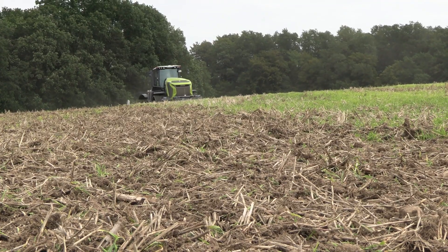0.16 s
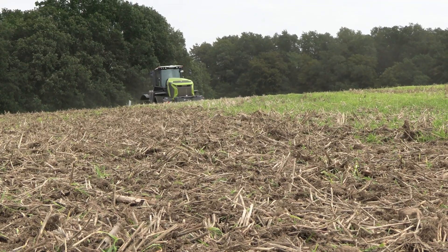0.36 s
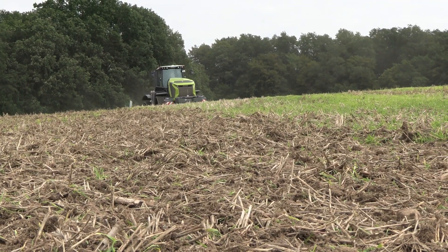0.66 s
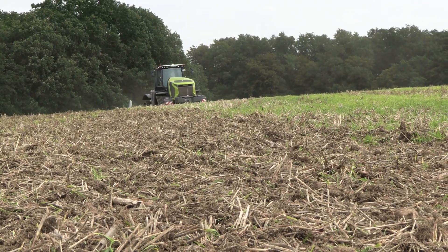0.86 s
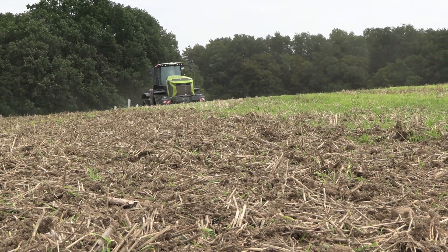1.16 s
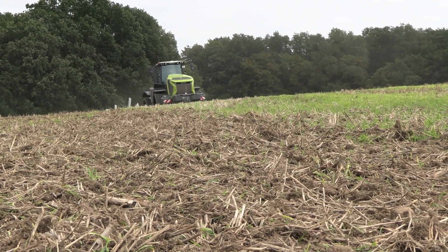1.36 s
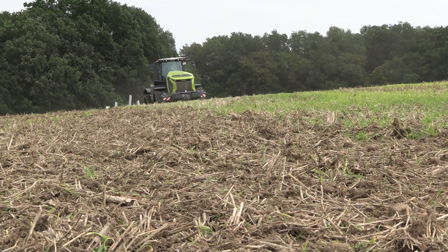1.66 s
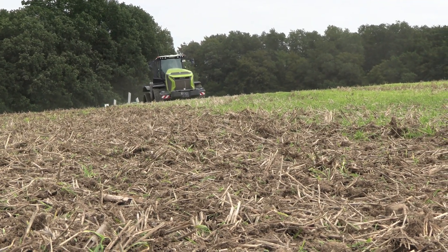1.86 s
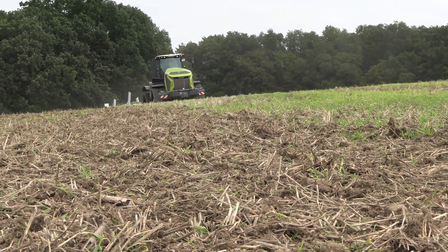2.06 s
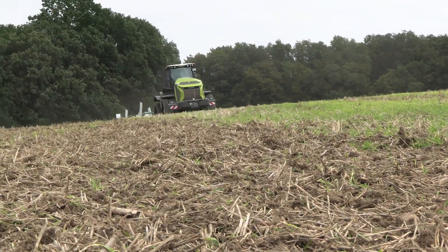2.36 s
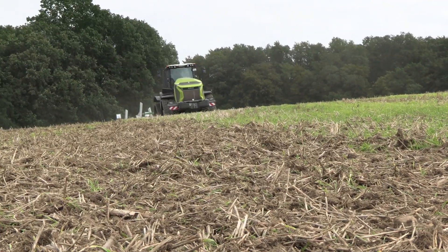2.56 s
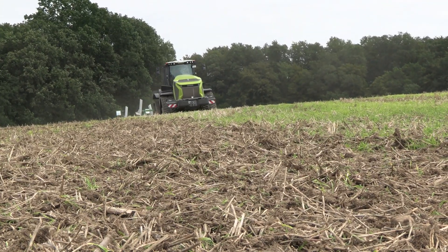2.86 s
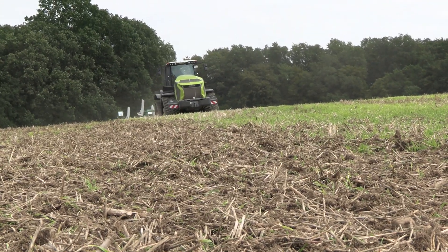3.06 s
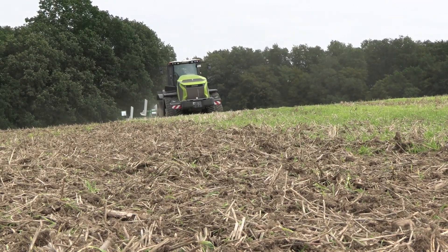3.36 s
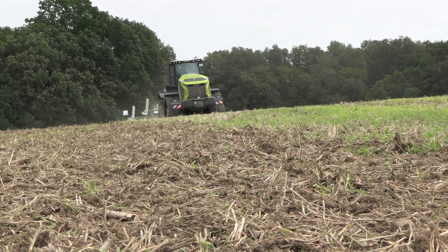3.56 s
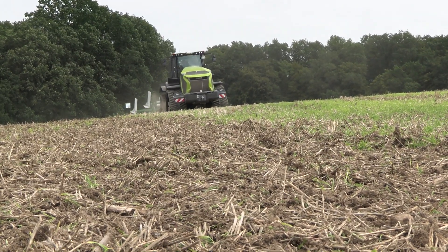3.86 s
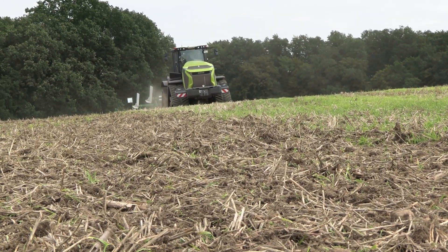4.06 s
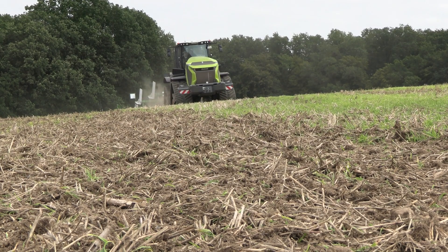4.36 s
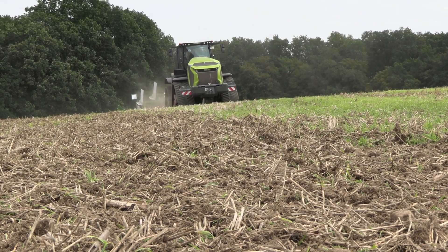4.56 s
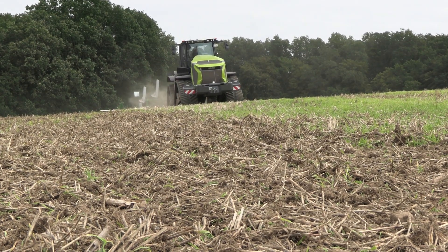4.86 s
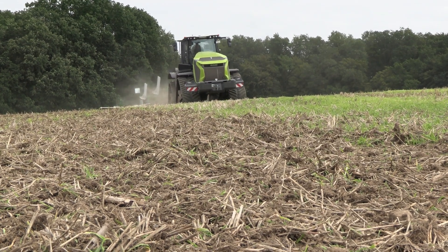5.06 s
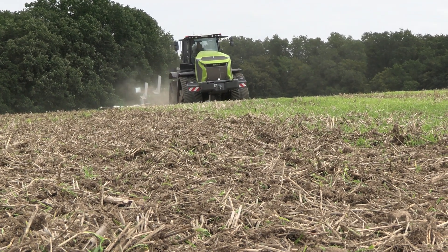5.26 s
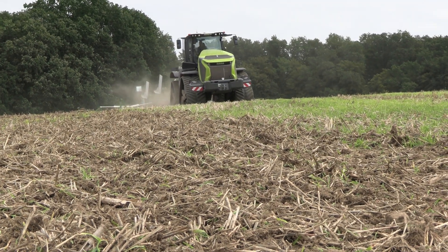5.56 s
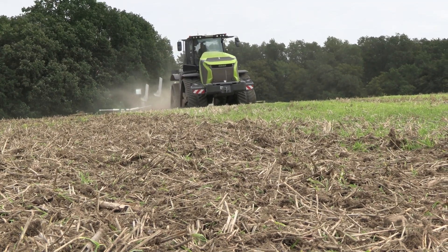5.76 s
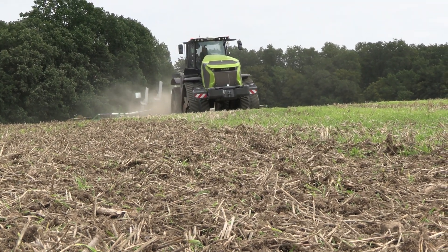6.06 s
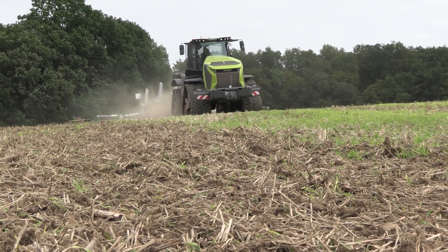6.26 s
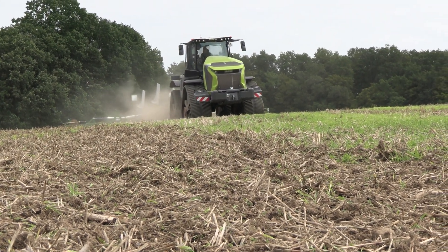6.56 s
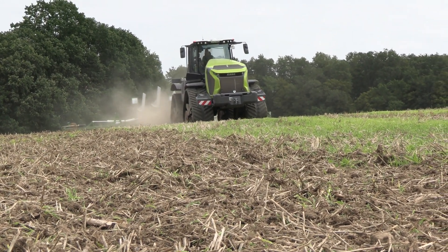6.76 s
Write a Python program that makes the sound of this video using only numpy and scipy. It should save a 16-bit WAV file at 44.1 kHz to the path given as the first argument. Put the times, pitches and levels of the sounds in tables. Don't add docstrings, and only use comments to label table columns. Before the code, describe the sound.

Outdoors in an open field, strong wind pounds an unprotected camera microphone with deep, overloaded thumps. Behind it a heavy diesel tractor works steadily under load, with low exhaust throb, block clatter, gear whine and rattling harrow steel. Automatic gain makes the machine dip at gusts, with dry ticks, especially in the first half. The final half second brings the machine forward.

```python
import sys
import numpy as np
from scipy import signal
from scipy.fft import rfft, irfft, next_fast_len
from scipy.io import wavfile
from scipy.ndimage import uniform_filter1d, map_coordinates

SR = 44100
rng = np.random.default_rng(int(sys.argv[2]) if len(sys.argv) > 2 else 0)


def unload_wav(signal):
    wavfile.write(
        sys.argv[1],
        SR,
        np.round(np.clip(np.atleast_2d(signal).T, -1, 1) * 32767).astype(np.int16),
    )


def attenuation_scalar(level_db):
    decades = np.asarray(level_db, float) / 20
    return 10 ** decades


N = 304290

# start_s, gain_drop_db, held_s, tick_peak_db
GAIN_DUCKS = [(0.188, 9, 0.16, -53), (0.4286, 6.5, 0.11, -53), (.748, 5.5, 0.013, -61),
              (0.913, 10.5, 0.015, -63), (1.01, 6, 0.014, -70), (1.057, 7, 0.07, -50.5),
              (1.188, 9.5, 0.065, -52), (1.43, 5.5, 0.073, -66), (1.4815, 7, 0.022, -51),
              (1.542, 11, 0.086, -50), (1.826, 8, 0.036, -60), (1.91, 6.5, 0.1, -50),
              (2.11, 3.5, 0.021, -68), (2.35, 8, 0.11, -51), (2.545, 8, .02, -49), (2.597, 12, 0.057, -48),
              (2.759, 4, 0.025, -65), (2.875, 2, 0.036, -51), (3.08, 4.5, 0.016, -62),
              (3.6306, 6.5, 0.078, -49), (3.735, 5.5, 0.059, -57), (4.0197, 5, 0.11, -49.5),
              (4.1803, 8, 0.094, -51), (4.3839, 4.5, .04, -53.5), (4.93, 2.5, 0.044, -66),
              (5.806, 3.5, 0.068, -68), (6.58, 1, 0.011, -64)]


def unit(x):
    return x / np.sqrt(np.mean(x ** 2) + 1e-20)


def curves(rows):
    s, *cols = np.transpose(rows)
    return [np.interp(np.arange(N) / SR, s, c) for c in cols]


def wobble(rate_hz):
    knots = rng.standard_normal(int(N * 200 / SR))
    return map_coordinates(knots, [np.arange(N) * min(rate_hz, 190) / SR])


def swells(rows):
    t = np.arange(N) / SR
    return np.sqrt(sum(attenuation_scalar(2 * db) * np.exp(-((t - s) / half_s) ** 2) for s, db, half_s in rows))


def filtered(x, response):
    m = next_fast_len(N + 8192)
    return irfft(rfft(x, m) * response(np.fft.rfftfreq(m, 1 / SR)), m)[:N]


def colour(points):
    f, db = np.transpose(points)
    return lambda hz: attenuation_scalar(np.interp(np.log(hz + 1), np.log(f + 1), db))


def rush(spectrum, patchy_db):
    z = signal.stft(rng.standard_normal(N), nperseg=512)[2]
    field = uniform_filter1d(rng.standard_normal(z.shape), size=5, axis=0)
    field = uniform_filter1d(field, size=8, axis=1)
    patchy = signal.istft(z * attenuation_scalar(patchy_db * unit(field)), nperseg=512)[1][:N]
    return filtered(patchy, colour(spectrum))


def evened(spectrum):
    swing = unit(filtered(rng.standard_normal(N), colour(spectrum)))
    power = np.abs(uniform_filter1d(swing ** 2, size=6000))
    return unit(swing / (power + .02) ** .4)


def ducking():
    snap_s, recover_s = .012, .045
    t = np.arange(N) / SR
    drop_db = 0
    for s, db, held_s, _ in GAIN_DUCKS:
        fall = np.clip((t - s) / snap_s, 0, 1)
        creep = np.exp(-(np.maximum(t - s - held_s, 0) / recover_s) ** 2)
        drop_db = drop_db + db * fall * creep
    return -drop_db


def buffet():
    # freq_hz, level_db_per_hz
    slow_spectrum = [(2, -22), (5, -5), (13, 0), (20, -3), (25, -12), (35, -50), (60, -140)]
    # freq_hz, level_db_per_hz
    flutter_spectrum = [(6, -140), (14, -50), (22, -0.5), (30, -4), (40, -6.5), (62, -17.5), (100, -31.5),
                        (200, -61), (500, -140)]
    # time_s, peak_db, half_length_s
    eddies = [(.16, -7, 0.048), (.46, -9, 0.097), (.72, -14.5, 0.11), (.98, -14.5, 0.042),
              (1.16, -14, 0.074), (1.4, -10, 0.076), (1.8, -19.5, 0.072), (2.1, -10, 0.11),
              (2.3, -15, 0.082), (2.52, -18.5, .05), (2.78, -14.5, 0.075), (2.97, -11, 0.087),
              (3.2, -17.5, 0.12), (3.7, -15.5, 0.058), (3.92, -11, 0.073), (4.13, -11.5, .06),
              (4.32, -13, 0.047), (4.6, -11.5, 0.079), (4.75, -12.5, .06), (4.92, -10, 0.047),
              (5.12, -15, 0.09), (5.4, -12, 0.15), (5.72, -13, 0.13), (6.07, -14, 0.099),
              (6.28, -16.5, 0.038), (6.45, -13.5, 0.041), (6.68, -9, 0.068), (6.88, -11.5, .05)]
    calm_db = -26
    slow = attenuation_scalar(-9.6) * evened(slow_spectrum)
    push = slow + np.hypot(swells(eddies), attenuation_scalar(calm_db)) * evened(flutter_spectrum)
    crest = np.exp(-(np.arange(N) / SR / .012) ** 2)
    return push + (.6 - push[0]) * crest


def snaps():
    # time_s, tick_peak_db
    small_steps = [(0.0882, -54), (0.7996, -62), (1.1104, -68), (1.26, -66), (1.3196, -45), (1.612, -52),
                   (1.669, -58), (2.0314, -61), (2.735, -50), (2.814, -60), (3.261, -59), (3.398, -52),
                   (3.7688, -58.5), (3.8496, -65), (3.8836, -56.5), (4.339, -60), (4.6374, -54.5),
                   (4.6728, -52), (4.8204, -53), (5.19, -62), (5.2814, -59), (5.42, -56), (5.5842, -61),
                   (5.73, -61), (5.892, -65), (6.05, -61), (6.32, -60), (6.4398, -51), (6.667, -56),
                   (6.7062, -46)]
    # freq_hz, level_db_per_hz
    tick_spectrum = [(300, -120), (1000, 3), (4000, -5), (9000, -6), (12000, -9.5), (15500, -13.5),
                     (16500, -120)]
    grit = [(1.345 + k * .021, -45 - k * 2.5) for k in range(5)]
    big_steps = [(s, db) for s, _, _, db in GAIN_DUCKS]
    s, db = np.transpose(small_steps + grit + big_steps)
    impulses = np.bincount(np.round((s + .003) * SR).astype(int), attenuation_scalar(db), N)
    decay = np.exp(-np.abs(np.arange(-SR // 10, SR // 10 + 1)) / SR / 0.0086)
    shape = signal.fftconvolve(impulses, decay, "same")
    return attenuation_scalar(-1.5) * shape * unit(filtered(rng.standard_normal(N), colour(tick_spectrum)))


def bonnet():
    # time_s, peak_db, half_length_s
    booms = [
        (.82, -61.5, 0.072),
        (3.2, -50, .14),
        (6.75, -57, 0.072),
    ]
    centre_hz, width_hz = 880, 220
    ring = lambda f: 1 / (1 + (2 * (f - centre_hz) / width_hz) ** 2)
    return swells(booms) * unit(filtered(rng.standard_normal(N), ring))


def chatter():
    # centre_hz, width_hz, level_db
    resonances = [(1600, 140, -2.5), (2070, 60, -2), (2260, 70, -1), (3050, 70, -3), (3650, 70, -6),
                  (4300, 80, -4.5), (5130, 90, -4.5), (5950, 70, -3), (6950, 60, -12), (8150, 66, -12),
                  (9250, 84, -20)]
    # start_s, held_s, level_db
    shakes = [
        (0, .16, -51),
        (.62, .04, -57),
        (.85, 0, -58),
        (1.35, .03, -55),
        (4.9, 0, -60),
        (5.75, 0, -61),
        (5.94, 0, -61),
    ]
    rise_db_per_s, fall_db_per_s = 352, 403
    t = np.arange(N) / SR
    shake = 0
    for s, held_s, db in shakes:
        before_db = rise_db_per_s * np.maximum(s - t, 0)
        after_db = fall_db_per_s * np.maximum(t - s - held_s, 0)
        shake = shake + attenuation_scalar(db - before_db - after_db)
    ring = lambda f: sum(attenuation_scalar(db) / (1 + (1.3 * (f - c) / w) ** 2) for c, w, db in resonances)
    return shake * unit(attenuation_scalar(3.7 * wobble(55)) * filtered(rush([(0, 0)], patchy_db=2.5), ring))


def humps(hz):
    # centre_hz, width_hz, gain_db
    panels = [(835, 43, 4.5), (1560, 36, 0.5), (1980, 110, 0), (5186, 210, 5), (6130, 180, 1),
              (8380, 340, 7)]
    return attenuation_scalar(sum(db / (1 + ((hz - c) / (w / 2)) ** 2) for c, w, db in panels))


def harrow(harrow_db, duck_db):
    # freq_hz, level_db_per_hz
    steel_spectrum = [(900, -120), (1800, 1), (3000, 1.5), (4700, 0.5), (6000, -2), (7000, -8),
                      (9000, -11.5), (11000, -17.5), (15600, -30.5), (16500, -120)]
    # time_s, extra_rattle_db
    jolts = [(.42, -4), (.64, 4), (.98, 5), (2.08, 4), (2.54, -4), (2.99, 5), (4.9, 9.5), (5.73, 2),
             (5.77, 5.5), (5.94, 6), (6.0, 3.5)]
    jolt_half_s, duck_share = .0094, .83
    t = np.arange(N) / SR
    rattle_db = harrow_db + sum(db * np.exp(-((t - s) / jolt_half_s) ** 2) for s, db in jolts)
    shaking = attenuation_scalar(0.88 * wobble(13) + 1.2 * wobble(90))
    steel = unit(shaking * filtered(rush(steel_spectrum, patchy_db=2.0), humps))
    return attenuation_scalar(rattle_db + 0.47 + duck_share * duck_db) * steel


def whine(hz, blur_hz, flutter_db):
    turns = np.cumsum(hz + blur_hz * wobble(120)) / SR
    flutter = attenuation_scalar(flutter_db * (0.67 * wobble(11) + wobble(45)))
    return np.sqrt(2) * flutter * np.sin(2 * np.pi * turns)


def gears(firing_hz):
    # time_s, pitch_hz
    wheel_track = [(0, 1760), (1.6, 1790), (2.1, 1825), (2.45, 1900), (2.75, 1975), (3.3, 2025), (4, 2015),
                   (4.8, 1995), (5.6, 2030), (6.9, 2030)]
    # time_s, wheel_db, pump_db
    tooth_levels = [(0, -6, -3), (.7, -5, 1), (1.4, -4, -3), (1.98, -1, -2), (2.08, 9, -2), (2.3, 6, -3),
                    (2.45, 1, -4), (2.75, 6, -5), (3.5, 2, -2), (4.2, 1, 2), (4.9, 0, 5), (5.2, 0, 8),
                    (6.05, 0, 8), (6.2, 0, 0), (6.9, -2, -4)]
    # time_s, pitch_hz, level_db
    turbo_track = [(0, 10700, -44), (2.4, 11000, -38), (3.6, 10950, -38), (5.1, 10680, -32),
                   (6, 10500, -34), (6.5, 10370, -28), (6.9, 10330, -28)]
    wheel_hz = curves(wheel_track)[0]
    wheel_db, pump_db = curves(tooth_levels)
    turbo_hz, turbo_db = curves(turbo_track)
    wheel = attenuation_scalar(wheel_db - 15) * whine(wheel_hz, blur_hz=45, flutter_db=3)
    shaft = attenuation_scalar(-19) * whine(wheel_hz * 9 / 26, blur_hz=5, flutter_db=3)
    pump = attenuation_scalar(pump_db - 18) * whine(firing_hz * 26, blur_hz=4, flutter_db=2.5)
    turbo = attenuation_scalar(turbo_db) * whine(turbo_hz, blur_hz=55, flutter_db=4)
    return wheel + shaft + pump + turbo


def block(turns):
    # freq_hz, level_db_per_hz
    block_spectrum = [(260, -24), (450, -0.5), (655, -3.5), (910, -2.5), (1150, -6), (1890, -7),
                      (2050, -5.5), (2310, -11), (4000, -21.5), (5200, -53.5), (8800, -120)]
    knock = 1 + .15 * np.cos(2 * np.pi * turns)
    clatter = filtered(rush(block_spectrum, patchy_db=0.5), humps)
    return unit(knock * attenuation_scalar(1.02 * wobble(30)) * clatter)


def engine(turns):
    # centre_hz, width_hz, level_db
    pipe_modes = [(57, 28, -10), (113, 40.7, 0), (173.5, 41.8, 2), (247.3, 60, -8), (342, 69, -17.5)]
    at = np.flatnonzero(np.diff(np.floor(turns)))
    cylinder_db = 6.1 * np.cos(np.arange(len(at)) * np.pi / 3)
    stroke_db = 5.9 * np.tanh(rng.standard_normal(600)[:len(at)])
    pulses = np.zeros(N)
    pulses[at] = attenuation_scalar(cylinder_db + stroke_db)

    def pipe(f):
        return sum((-1) ** k * attenuation_scalar(db) * 1j * f * w / (c * c - f * f + 1j * f * w + 1e-9)
                   for k, (c, w, db) in enumerate(pipe_modes))

    return unit(filtered(pulses - pulses.mean(), pipe))


def roar(turns, duck_db):
    # freq_hz, level_db_per_hz
    roar_spectrum = [(29, -31), (50, -8.5), (70, -5.5), (102, -5), (178, -8), (253, -13.5), (386, -26),
                     (700, -39), (910, -75.5), (1540, -120)]
    # time_s, roar_db, large_over_small_eddies_db
    wind_track = [(0, -29, -4), (.15, -26.5, -5), (.45, -34, -4), (.8, -29, -1), (1.2, -26.5, 0),
                  (1.6, -27, 0), (2.1, -27, 0), (2.6, -28, 0.5), (3.0, -25, 0), (3.45, -26, 1.5),
                  (3.8, -30.5, 1), (3.95, -28.5, 1.5), (4.5, -26.5, 2.5), (5.1, -33, 4), (5.6, -29, 2),
                  (5.85, -34.5, 1), (6.3, -30.5, 1), (6.9, -29, 2)]
    eddy_hz, duck_share = 120, .65
    roar_db, eddy_db = curves(wind_track)
    air = rush(roar_spectrum, patchy_db=-1.0)
    air = air + (attenuation_scalar(eddy_db) - 1) * filtered(air, lambda hz: 1 / (1 + (hz / eddy_hz) ** 4))
    mix = unit(attenuation_scalar(1.2 * wobble(25)) * air) + attenuation_scalar(-7.0) * engine(turns)
    return attenuation_scalar(roar_db + duck_share * duck_db) * mix


def machine():
    # time_s, firing_hz
    firing_track = [(0, 57.5), (1, 58), (2.1, 57), (2.6, 58), (3.5, 60.5), (4.1, 59.2), (5, 58.7),
                    (5.6, 58.5), (6.9, 56.8)]
    # time_s, machine_db, harrow_over_engine_db
    approach = [(0, -51.5, 0.5), (.15, -51, -2.5), (.7, -53, -7.5), (.9, -46.5, -5.5), (1.35, -48.5, -2),
                (1.75, -47, -5.5), (2.2, -49.5, -5.5), (2.8, -46.5, -9), (3.25, -46, -7), (3.6, -46.5, -10),
                (3.9, -51.5, -3), (4.3, -50.5, -7), (4.7, -52, -11), (5.1, -54, -5.5), (5.6, -51.5, -9),
                (6.42, -50.5, -7.5), (6.5, -48, -3.5), (6.65, -44, -5), (6.9, -44, -5)]
    block_duck_share = .85
    near_db, harrow_db = curves(approach)
    duck_db = ducking()
    firing_hz = curves(firing_track)[0]
    turns = np.cumsum(firing_hz) / SR
    hard = attenuation_scalar(block_duck_share * duck_db) * (block(turns) + gears(firing_hz))
    hard = hard + harrow(harrow_db, duck_db)
    return attenuation_scalar(near_db) * hard + roar(turns, duck_db)


def scene():
    return (buffet() + machine() + chatter() + snaps() + bonnet())[None]


def starve(x, unrest_db):
    # freq_hz, level_db
    floor_spectrum = [(2000, -99.5), (5000, -101), (8000, -99), (10000, -97.5), (15000, -99)]
    # time_s, threshold_rise_db, half_length_s
    famines = [(.29, 18, .025), (.5, 3, .03), (2.635, 11, .02), (4.23, 4, .03), (4.78, 8, .012),
               (4.945, 11, .01), (5.31, 8, .015), (5.68, 9, .015), (5.79, 7, .01)]
    duck_share = .28
    hz, t, z = signal.stft(x, SR, nperseg=2048, noverlap=1024)
    band_number = np.floor(26 * np.log(hz / 700 + 1))
    _, first, band, wide = np.unique(band_number, True, True, True)
    band_rms = np.sqrt(np.add.reduceat(np.abs(z) ** 2, first) / wide[:, None])
    unrest = rng.standard_normal(len(t)) + .6 * rng.standard_normal(band_rms.shape)
    rise = attenuation_scalar(-duck_share * ducking()) + swells(famines)
    rise = rise[np.minimum(t * SR, N - 1).astype(int)]
    lack = colour(floor_spectrum)(hz)[:, None] * (attenuation_scalar(unrest_db * unrest) * rise / band_rms)[band]
    kept = np.where(hz[:, None] > 1500, 1 / (1 + np.minimum(lack, 10) ** 14), 1)
    return signal.istft(z * kept, SR, nperseg=2048, noverlap=1024)[1][:N]


def roll_off(x):
    return signal.sosfilt(signal.butter(12, 15740, fs=SR, output="sos"), x)


def record(dry):
    low = filtered(dry[0], lambda hz: 1 / (1 + (hz / 60) ** 4))
    flat = low / (1 + np.abs(low / .7) ** 5) ** (1 / 5)
    mix = starve(dry[0] - low + flat, unrest_db=6.0)[None]
    return roll_off(mix)


dry = scene()
out = record(dry)
unload_wav(out)
```